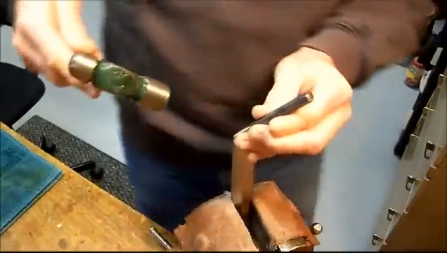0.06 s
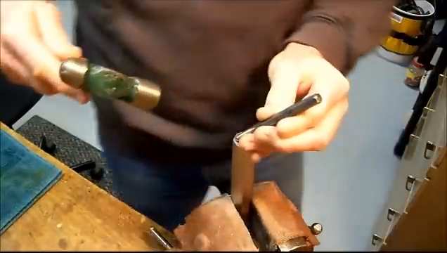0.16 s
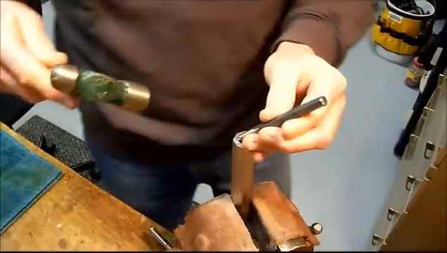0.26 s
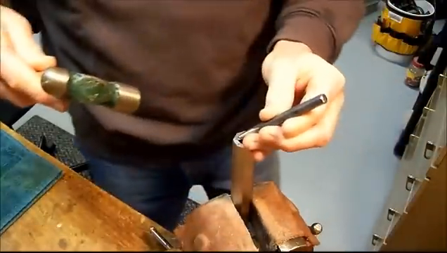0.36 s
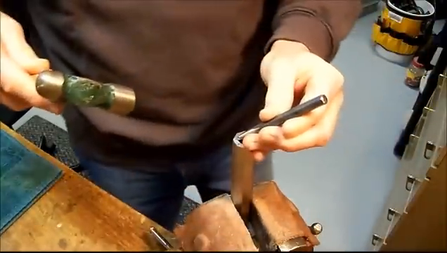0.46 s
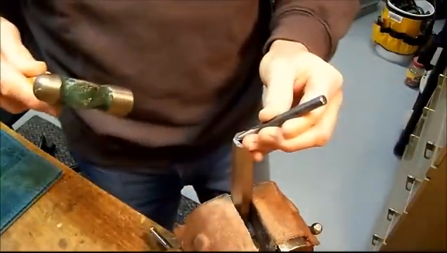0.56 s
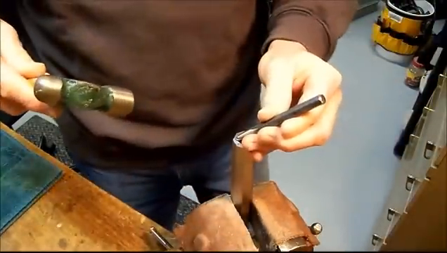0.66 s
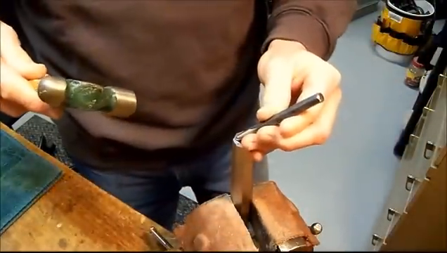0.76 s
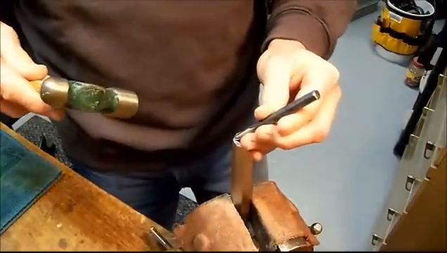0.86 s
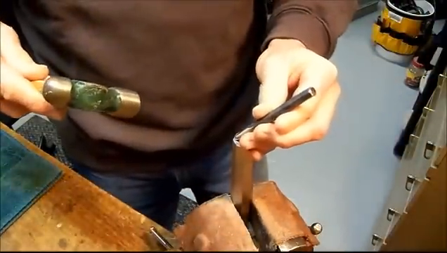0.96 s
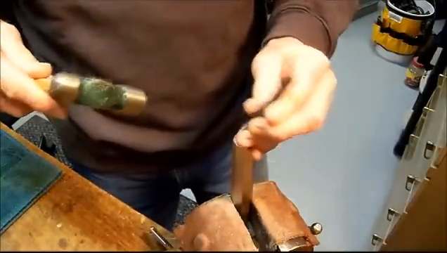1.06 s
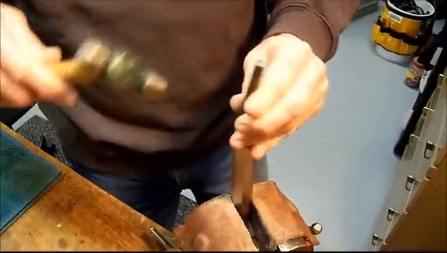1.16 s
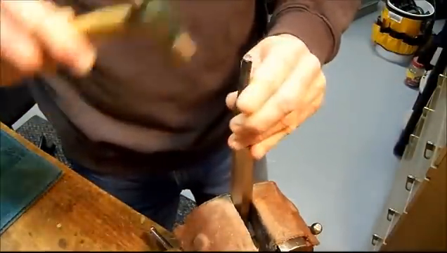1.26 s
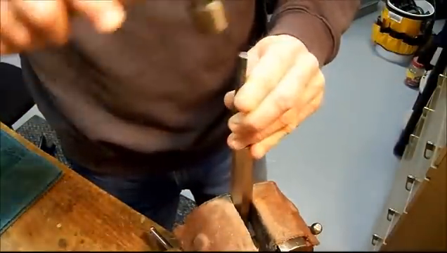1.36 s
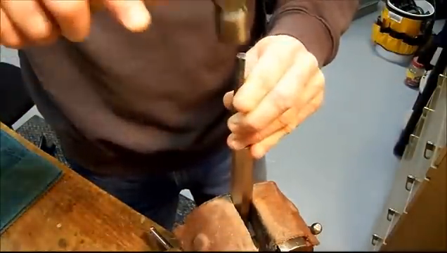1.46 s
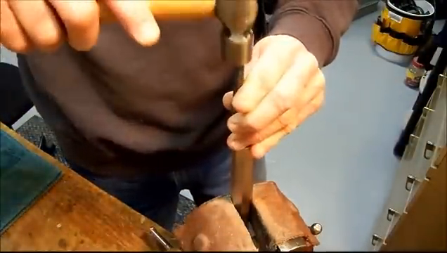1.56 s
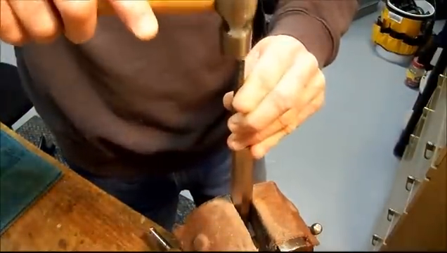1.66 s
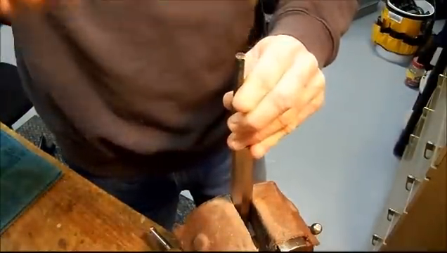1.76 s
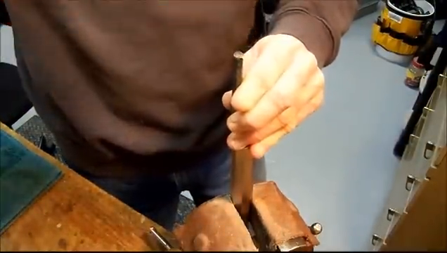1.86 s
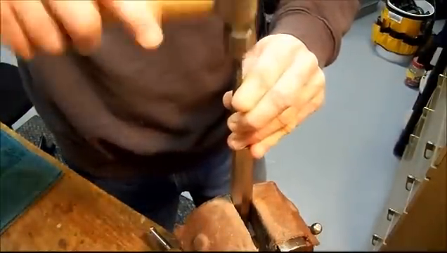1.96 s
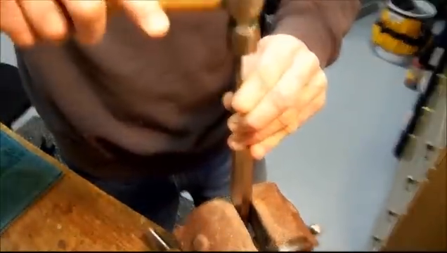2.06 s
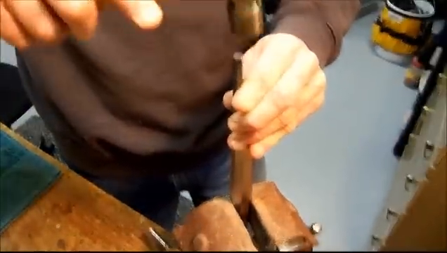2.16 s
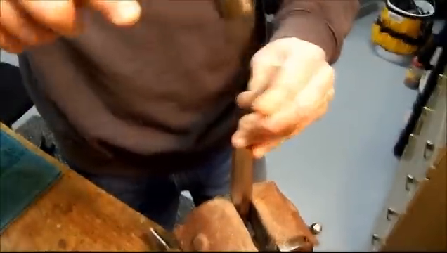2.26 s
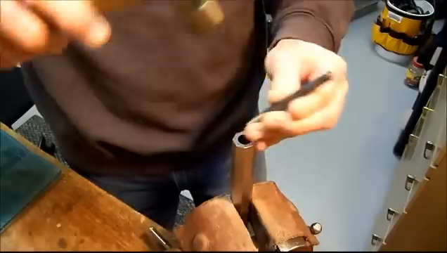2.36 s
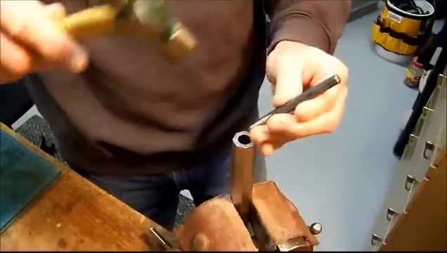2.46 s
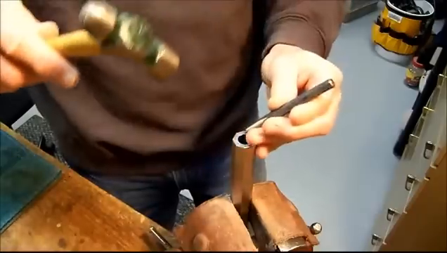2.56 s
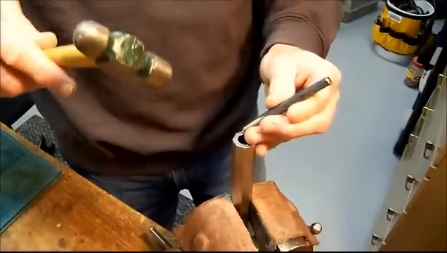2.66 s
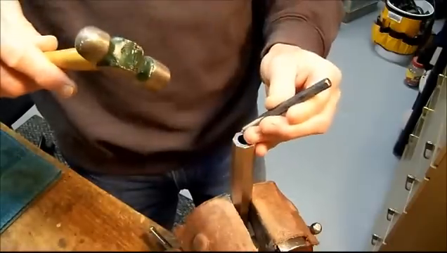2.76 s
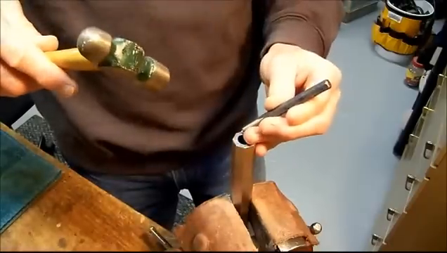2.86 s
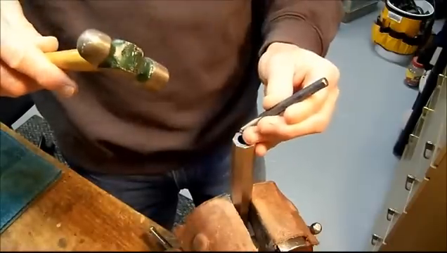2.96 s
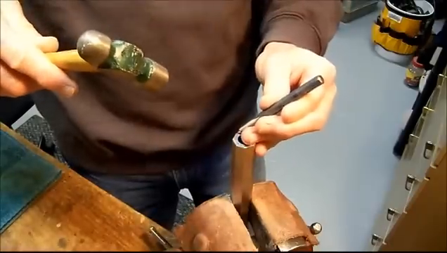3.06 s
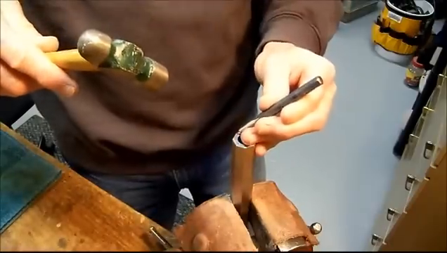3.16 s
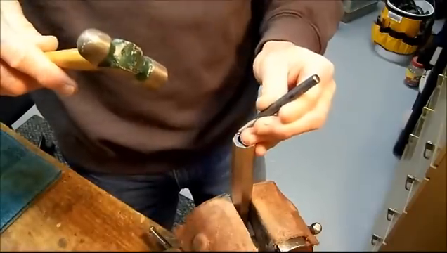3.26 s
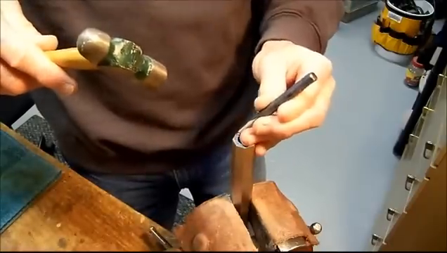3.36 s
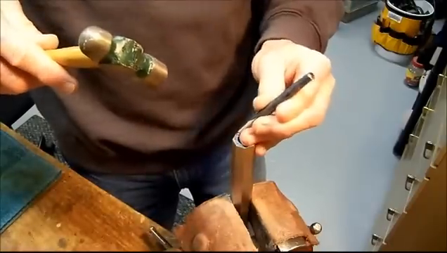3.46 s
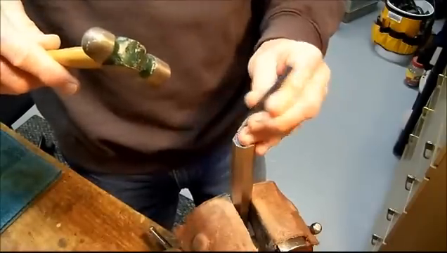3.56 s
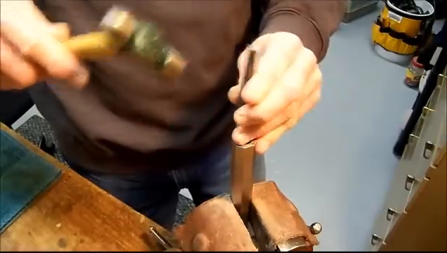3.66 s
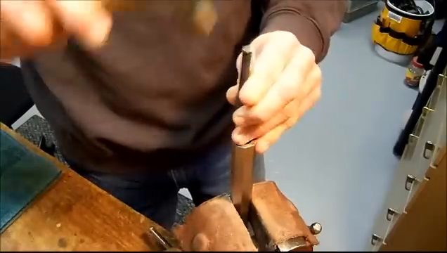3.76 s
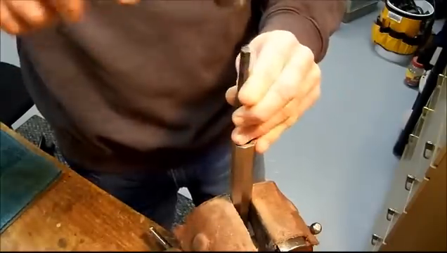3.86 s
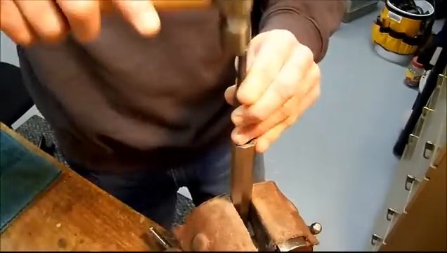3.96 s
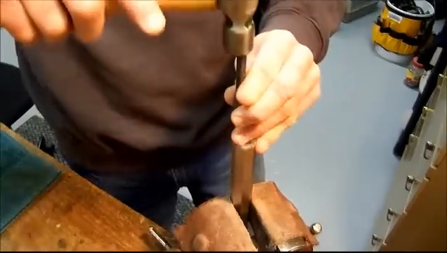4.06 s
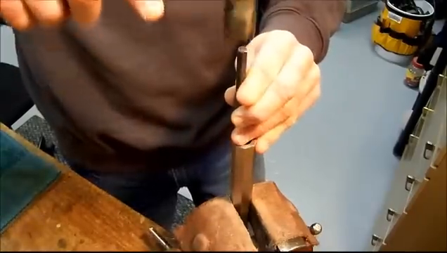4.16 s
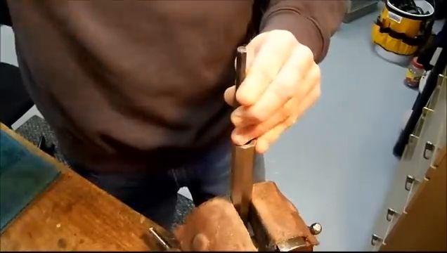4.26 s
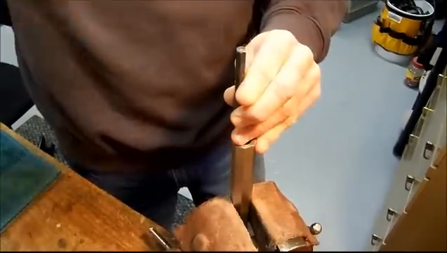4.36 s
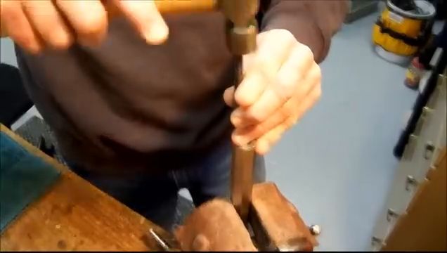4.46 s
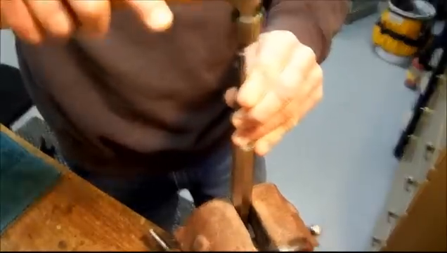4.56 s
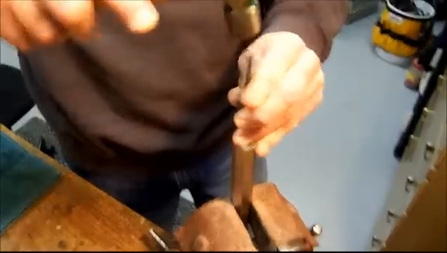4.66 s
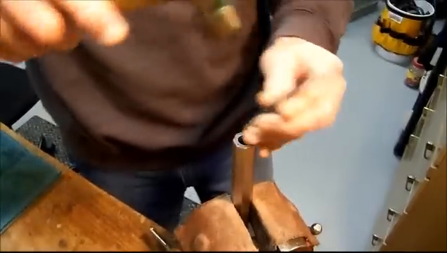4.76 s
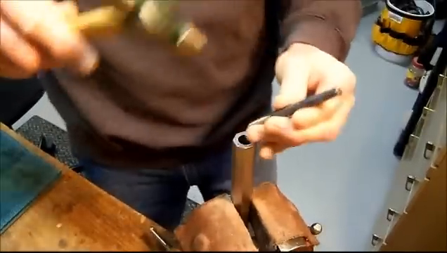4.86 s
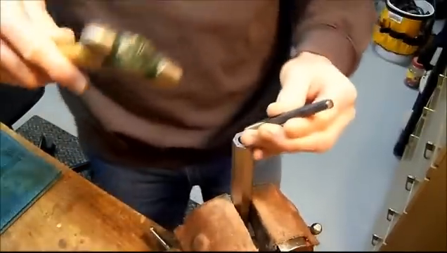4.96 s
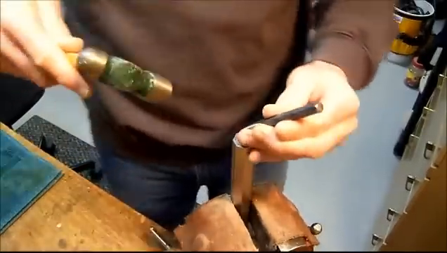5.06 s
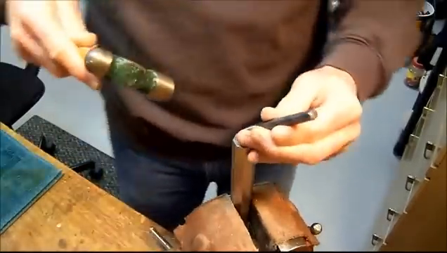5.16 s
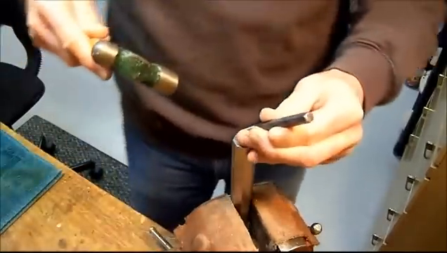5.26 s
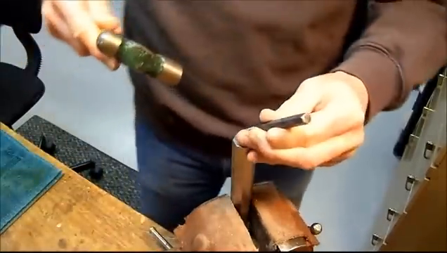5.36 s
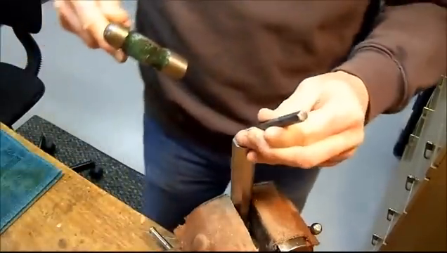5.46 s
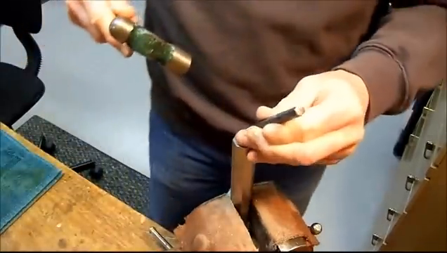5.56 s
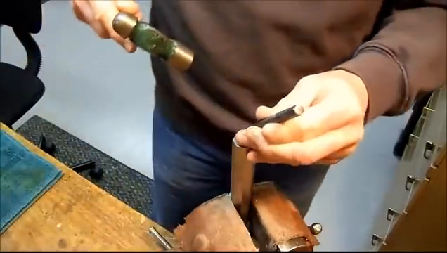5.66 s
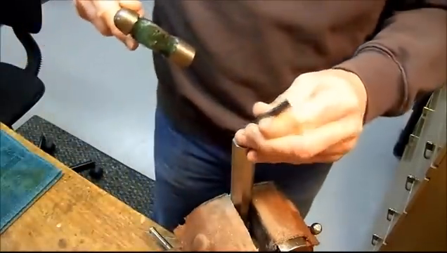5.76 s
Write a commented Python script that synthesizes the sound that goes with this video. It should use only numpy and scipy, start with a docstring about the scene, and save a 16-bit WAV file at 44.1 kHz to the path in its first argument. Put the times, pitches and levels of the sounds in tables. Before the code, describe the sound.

A hammer strikes a steel punch in two pairs of sharp, briefly ringing metallic hits, with tools rattling over faint workshop ventilation.

```python
"""Hammer and punch at a bench vise.

In a small workshop a hammer drives a steel punch against a tube held in a vise. Twice a light setting
tap is followed by a full blow: the impact excites the damped modes of the steel, the bench shudders
and loose tools bounce on it. In between, the punch ticks and scratches faintly as it is placed;
ventilation rumbles behind."""
import numpy as np
from scipy import signal
from scipy.fft import rfft, irfft
from scipy.io import wavfile
from scipy.ndimage import uniform_filter1d, minimum_filter1d
import sys
import numpy as np
from scipy import signal
from scipy.fft import rfft, irfft
from scipy.io import wavfile
from scipy.ndimage import uniform_filter1d, minimum_filter1d

SR = 44100
rng = np.random.default_rng(int(sys.argv[2]) if len(sys.argv) > 2 else 0)


def persist_wave(psi):
    """Save psi, clipped to +-1, as 16-bit WAV."""
    counts = np.round(np.clip(psi, -1, 1) * 32767).astype(np.int16)
    wavfile.write(sys.argv[1], SR, np.atleast_2d(counts).T)


N = 256220
T = np.arange(int(1.4 * SR)) / SR   # time since an impact, t/s

# Hammer impacts: t/s, level/dB, force (0 tap, 1 full blow), bite near 3 kHz/dB, punch ring/dB,
# hammer ring/dB, crack/dB, contact cut-off/Hz. Levels in all tables are relative.
IMPACTS = [(1.6300, 1, 0, -4.5, 3, -17, 18.5, 14000), (2.0360, 4.5, 0.9, 1, 3.5, -10, 14, 13500),
           (4.0482, 0, 0.076, 4, -3.5, 1, 17, 12700), (4.1273, -15.5, 0.54, -9, -11, -16.5, -15, 6490),
           (4.5162, 1, 0.93, -0.5, 3, 5.5, 19, 14100)]
# Modes of the vise and clamped tube: f/Hz, tap level/dB, full-blow level/dB, T60/s
VISE_MODES = [(455, -38, -29, .2), (655, -24, -32, .18), (684, -38, -14, .17), (776, -28, -24.5, .17),
              (890, -30, -31, .16), (998, -32, -16, .17), (1028, -29, -34, .17), (1280, -41, -27, .18),
              (1730, -50, -31, .18), (1902, -47, -29, .18), (2680, -52, -24, .2), (2730, -50, -18, .21),
              (2762, -52, -21, .2), (2800, -48, -20.5, .24), (2874, -48, -22, .26), (2995, -40, -32, .2)]
# Modes of the punch: f/Hz, tap level/dB, full-blow level/dB, T60/s
PUNCH_MODES = [ (5760, -49, -29.5, .25), (5850, -42, -37, .2), (6742, -42, -26, .2), (6835, -49, -29, .18),
               (6887, -49, -28, .16), (7782, -35, -28, .17), (8052, -37, -32, .18), (9285, -46, -35, .16),
               (9688, -50, -29, .17), (10520, -55, -29, .13), (10659, -80, -33, 1.02),
               (10661.4, -70, -28, .6), (11430, -41, -32, .21), (12975, -28, -33, .17),
               (13255, -46, -22.5, .18)]
# Modes of the hammer head: f/Hz, tap level/dB, full-blow level/dB, T60/s
HAMMER_MODES = [(8478, -38, -37, .38), (8815, -39, -32, .17)]
# Modes of the bench: f/Hz, tap level/dB, full-blow level/dB, T60/s
BENCH_MODES = [(30, -45, -27, .9), (58.5, -52, -18, .38), (122, -58, -28.5, .83), (183, -52, -35, .42),
               (236, -42, -33, .25)]
# Dense clash filling the room: f/Hz, tap spectrum level/dB, full-blow spectrum level/dB, T60/s
CLASH_SPECTRUM = [(80.07, -71, -57.5, 0.2), (220, -58, -53, 0.64), (450, -61, -52.5, 0.27),
                  (836, -57.5, -49, 0.3), (1350, -70, -54.5, .23), (2300, -66, -55, 0.24),
                  (4400, -72, -54, 0.15), (6600, -63, -58, 0.23), (7650, -64.5, -56, 0.15),
                  (9000, -77.5, -56, 0.21), (11400, -83, -50.5, .13), (15600, -79, -60.5, 0.12)]
# Loose tools hopping, from their first landing: t/s, number of landings, clack level/dB, tick level/dB
TOOL_BOUNCES = [(1.6894, 3, -32.5, -53), (2.0832, 4, -34.5, -12.5), (2.2123, 5, -37, -53),
                (2.197, 2, -44.5, -66), (4.1948, 3, -50, -70), (4.5650, 4, -35, -15),
                (4.587, 3, -28.5, -22.5), (4.6936, 5, -42.5, -53), (4.7130, 3, -39.5, -54)]
# Punch tip set down on the tube: t/s, level/dB
TIP_KNOCKS = [(.318, -57), (.921, -56.5), (3.411, -56.5), (4.398, -60.5), (5.672, -63)]
# Punch tip sliding over the rim: t/s, level/dB, centre f/Hz, length (half of T60)/s
TIP_SCRATCHES = [(0.315, -56, 11700, .03), (0.423, -65, 2600, 0.19), (1.067, -56.5, 7700, .039),
                 (1.139, -57.5, 7500, 0.077), (1.198, -63.5, 2390, .1), (3.376, -63, 11350, 0.033),
                 (5.284, -70.5, 2200, 0.17)]
# Ventilation noise: f/Hz, spectrum level/dB
AIR_SPECTRUM = [(12, -33.5), (20, 4.5), (66, -1), (103, -1), (135, -1.5), (433, -13.5), (674, -18),
                (733, -18.5), (1020, -22), (1780, -28), (7510, -35.5), (11700, -35.5), (13800, -37),
                (15000, -68)]


def hammer_blows(vise_db, clash_db, damping_db):
    """Impact excitation: each blow sets punch, hammer, vise and bench into free vibration."""
    out, punch = np.zeros(N), np.zeros(N)
    for start, level_db, force, bite_db, punch_db, hammer_db, crack_db, contact_hz in IMPACTS:
        level, early = from_db(level_db), early_field(force)
        shank = from_db(punch_db) * ring(PUNCH_MODES, force, bite_db, rise_s=.0004, scatter=.3)
        head = from_db(hammer_db) * ring(HAMMER_MODES, force, bite_db, rise_s=.0004, scatter=.3)
        vise = from_db(vise_db) * ring(VISE_MODES, force, bite_db, rise_s=.003, scatter=.5)
        bench = ring(BENCH_MODES, force, bite_db, rise_s=.025, scatter=.3)
        burst = from_db(clash_db) * clash(force, bite_db, crack_db, contact_hz)
        punch[int(start * SR):] *= from_db(damping_db)   # a new contact damps the punch's earlier ring
        add(punch, start, level * shank * early)
        add(out, start, level * (head + bench + (vise + burst) * early))
    return out + punch


def ring(modes, force, bite_db, rise_s, scatter):
    """Superposition of damped modes: reflections roughen the short ones, the long ones stay pure."""
    out = 0
    for hz, tap_db, full_db, t60 in modes:
        gain = from_db(tap_db + force * (full_db - tap_db) + bite(hz, bite_db))
        roughness = scatter * min(1, (.18 / t60) ** 2)
        phasor = np.exp(2j * np.pi * hz * T) * (1 + roughness * flutter(rate_hz=150))
        wave = phasor.imag / np.hypot(1, roughness)   # keeps the mean power
        out += gain * decay(t60, rise_s) * wave
    return out


def clash(force, bite_db, crack_db, contact_hz, crack_t60=.0094, tap_decay=.75, build_cycles=2.1):
    """Modal overlap: countless short modes and echoes merge into noise, a crack and a tail per band."""
    out, edges = 0, np.geomspace(70, 14500, 27)
    table_hz, *columns = np.transpose(CLASH_SPECTRUM)
    for low, high in zip(edges, edges[1:]):
        hz = np.sqrt(low * high)
        tap_db, full_db, t60 = [np.interp(np.log(hz), np.log(table_hz), column) for column in columns]
        gain = from_db(tap_db + force * (full_db - tap_db) + bite(hz, bite_db)) * np.sqrt(high - low)
        gain /= np.sqrt(1 + (hz / contact_hz) ** 10)   # a slow contact cannot excite the top
        rise_s = build_cycles / hz   # lows take longer to build
        tail = decay(t60 * (tap_decay + force * (1 - tap_decay)), rise_s)
        crack = from_db(crack_db) * hz / (hz + 1200) * decay(crack_t60, rise_s)
        out += gain * band_noise(low, high) * (tail + crack)
    return out


def bite(hz, bite_db):
    """Contact geometry, as a gain in dB: square faces lift the upper mids, a glancing blow dulls them."""
    return bite_db * np.exp(-np.log2(hz / 3000) ** 2 / .9)


def early_field(force, full_blow_db=5.5, length_s=.034):
    """Early reflections and parts clattering together swell the opening moments of a blow."""
    peak = from_db(full_blow_db * (.5 + .5 * force))
    return 1 + (peak - 1) * np.exp(-(T / length_s) ** 4)


def loose_tools(clack_hz, tick_hz, wood_hz, swing_s=.0311, flight_s=.0045, tick_loss_db=6.5):
    """Driven bouncing: tools land about once per bench swing, with a wooden clack and a steel tick."""
    clacks, ticks = np.zeros(N), np.zeros(N)
    echo = from_db(-22.5) * decay(t60=.08, rise_s=.002)
    clack_envelope = decay(t60=.01, rise_s=.0003) + echo
    tick_envelope = decay(t60=.0067, rise_s=.0001) + echo
    for start, landings, clack_db, tick_db in TOOL_BOUNCES:
        for k in range(landings):
            settle_db = 7.5 if 1 < k == landings - 1 else 0   # the last of three or more barely lifts off
            clack_gain = from_db(clack_db - settle_db)
            tick_gain = from_db(tick_db - k * tick_loss_db)
            add(clacks, start, clack_gain * band_noise(*clack_hz) * clack_envelope)
            add(ticks, start, tick_gain * band_noise(*tick_hz) * tick_envelope)
            start += swing_s + flight_s * tick_gain   # a harder landing rebounds for longer
    wood_lowpass = signal.butter(2, wood_hz, fs=SR, output="sos")
    return signal.sosfilt(wood_lowpass, clacks + 1e-18) + ticks


def punch_placing(knock_t60):
    """Light impact and sliding friction: the punch tip knocks on the tube and scratches over its rim."""
    out = np.zeros(N)
    for start, level_db in TIP_KNOCKS:
        knock = band_noise(630, 1100) + .46 * band_noise(1200, 2200)
        add(out, start, from_db(level_db) * knock * decay(knock_t60, rise_s=.00098))
    for start, level_db, hz, length_s in TIP_SCRATCHES:
        scratch = band_noise(hz - 800, hz + 800, order=1)
        add(out, start, from_db(level_db) * scratch * decay(2 * length_s, rise_s=.0011))
    return out


def ventilation(start_db, gain_step_db, gain_step_s):
    """Steady dull broadband noise; the recorder's gain control turns it down after each full blow."""
    hz, level_db = np.transpose(AIR_SPECTRUM)
    bin_hz = np.maximum(np.fft.rfftfreq(N, 1 / SR), 1)
    spectrum = from_db(np.interp(np.log(bin_hz), np.log(hz), level_db))
    air = irfft(rfft(rng.standard_normal(N)) * spectrum, N)
    t = np.arange(N) / SR
    full_blows = [start for start, _, force, *_ in IMPACTS if force > .75]
    gain_steps = sum(np.clip((t - start) / gain_step_s, 0, 1) for start in full_blows)
    return air / air.std() * from_db(start_db - gain_step_db * gain_steps)


def decay(t60, rise_s):
    """Exponential damping: a quick swell, then 60 dB down in t60 seconds."""
    return (1 - np.exp(-T / rise_s)) * np.exp(-np.log(1000) * T / t60)


def band_noise(low_hz, high_hz, order=2):
    """Band-limited Gaussian noise of unit rms."""
    bandpass = signal.butter(order, [low_hz, high_hz], "band", fs=SR, output="sos")
    noise = signal.sosfilt(bandpass, rng.standard_normal(len(T)))
    return noise / noise.std()


def flutter(rate_hz):
    """Random modulation: a complex amplitude gliding to a new value rate_hz times a second."""
    knots = rng.standard_normal((400, 2)) @ [1, 1j] / np.sqrt(2)
    return np.interp(T * rate_hz, np.arange(len(knots)), knots)


def from_db(db):
    """Amplitude ratio of a level in decibels."""
    return 10 ** (np.asarray(db) / 20)


def add(out, start, sound):
    """Linear superposition: mix a sound in from a start time in seconds."""
    i = int(start * SR)
    out[i:i + len(sound)] += sound[:N - i]


def limiter(x, ceiling_db, release_db_per_s):
    """Peak limiting: the gain drops at once on a peak and recovers steadily."""
    excess_db = np.maximum(20 * np.log10(np.abs(x) + 1e-9) - ceiling_db, 0)
    release_db = release_db_per_s * np.arange(N) / SR
    reduction_db = np.maximum.accumulate(excess_db + release_db, axis=-1) - release_db
    smooth_gain_db = uniform_filter1d(minimum_filter1d(-reduction_db, size=21), size=21)
    return x * from_db(smooth_gain_db)


def scene():
    """The sound pressures of all sources add at one microphone above the bench."""
    blows = hammer_blows(vise_db=1.5, clash_db=-2, damping_db=-11.5)
    rattle = loose_tools(clack_hz=(780, 1900), tick_hz=(2400, 6000), wood_hz=2200)
    touches = punch_placing(knock_t60=.24)
    air = ventilation(start_db=-52, gain_step_db=3, gain_step_s=.33)
    return (blows + rattle + touches + air)[None]


def record(dry):
    """Peak and band limiting: the full blows are held down and a steep low-pass cuts the top."""
    limited = limiter(dry, ceiling_db=-3.8, release_db_per_s=4000)
    cutoff_hz = 14100
    lowpass = signal.ellip(8, .2, 80, cutoff_hz, fs=SR, output="sos")
    return signal.sosfilt(lowpass, limited)


dry = scene()
out = record(dry)
persist_wave(out)
```